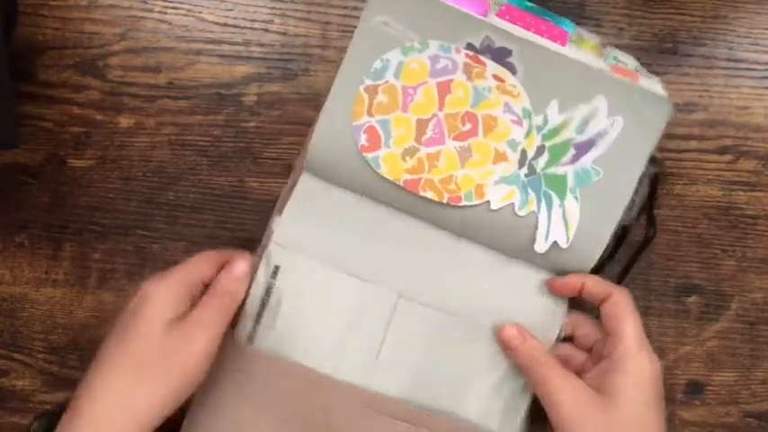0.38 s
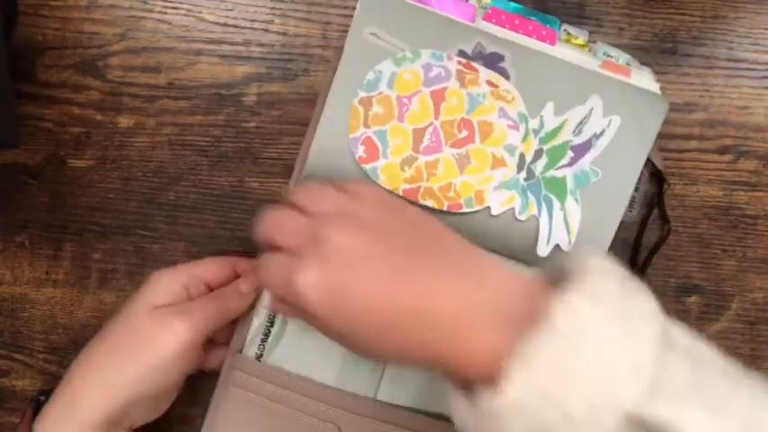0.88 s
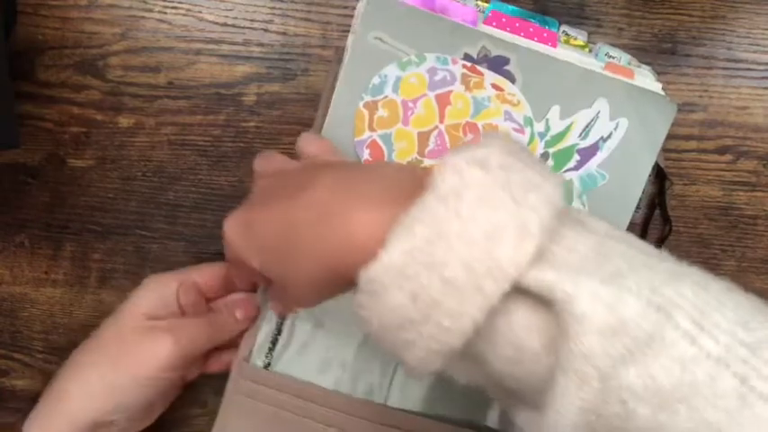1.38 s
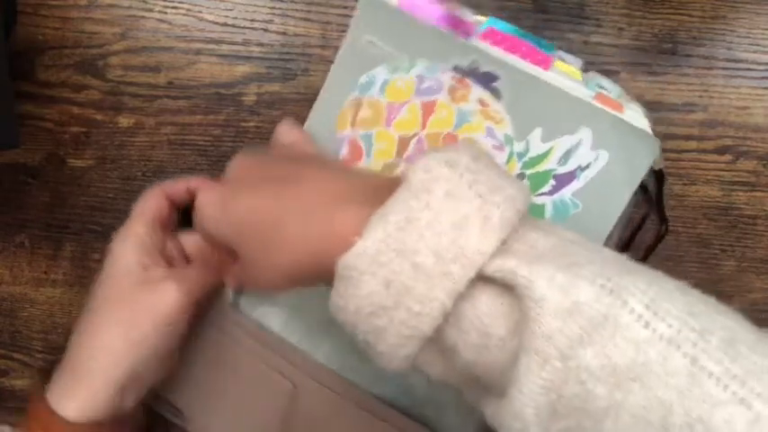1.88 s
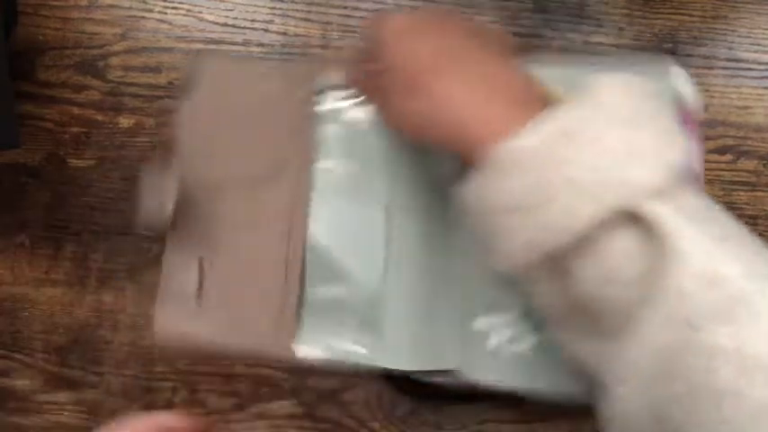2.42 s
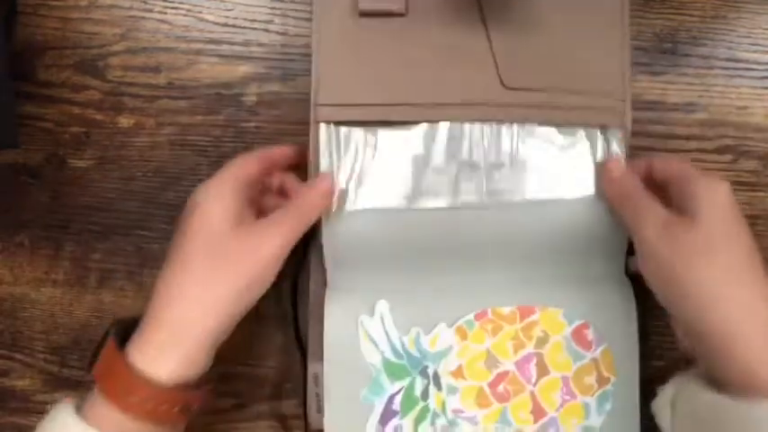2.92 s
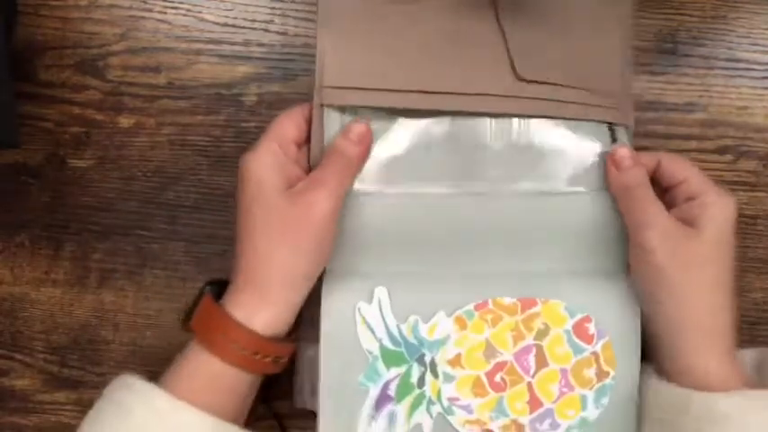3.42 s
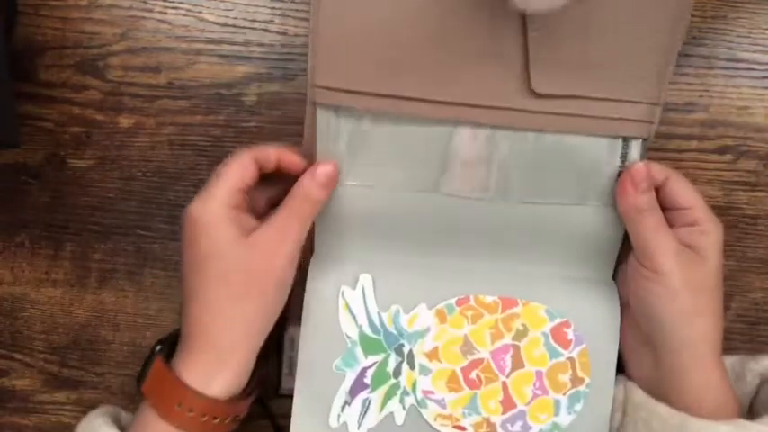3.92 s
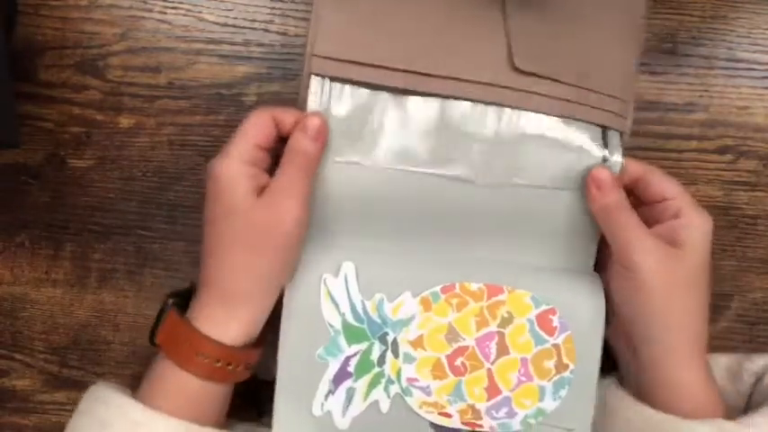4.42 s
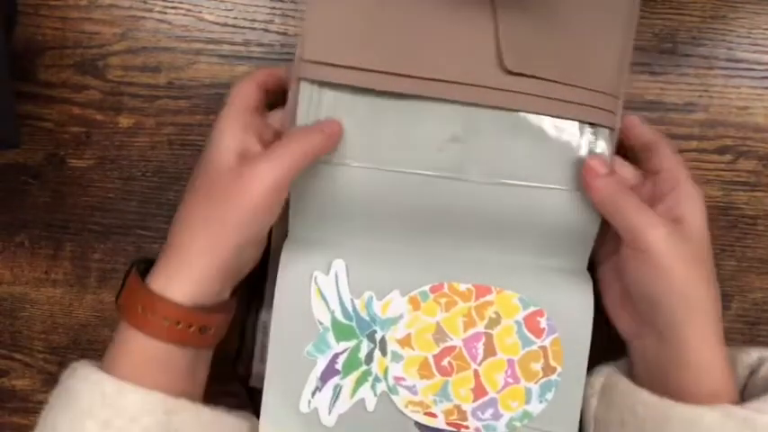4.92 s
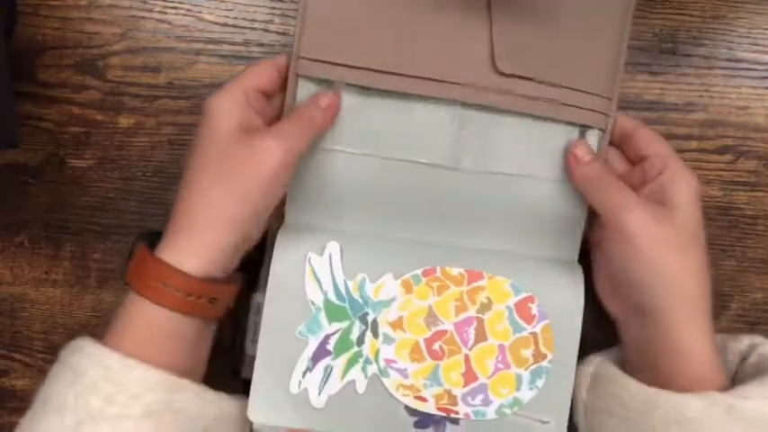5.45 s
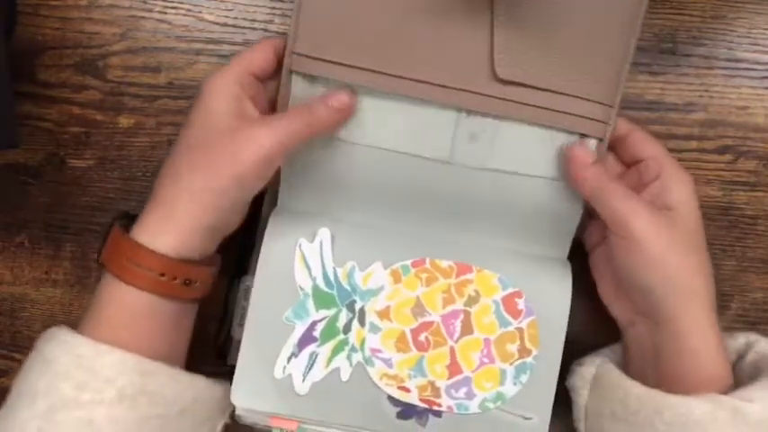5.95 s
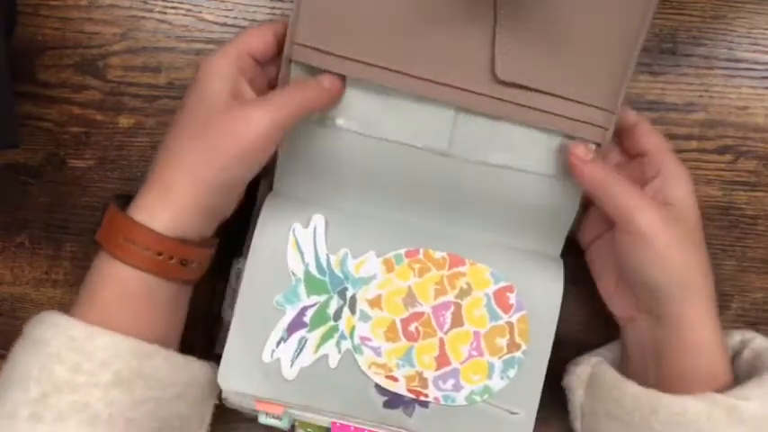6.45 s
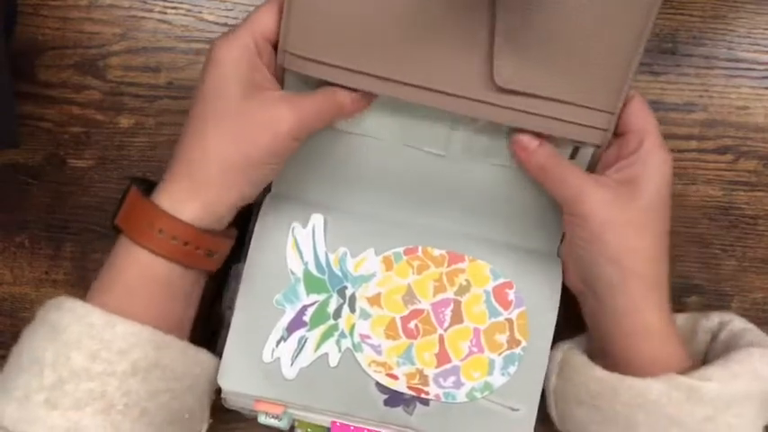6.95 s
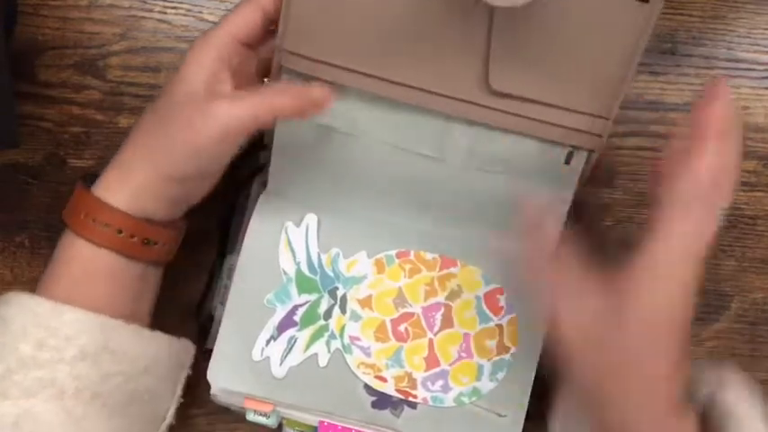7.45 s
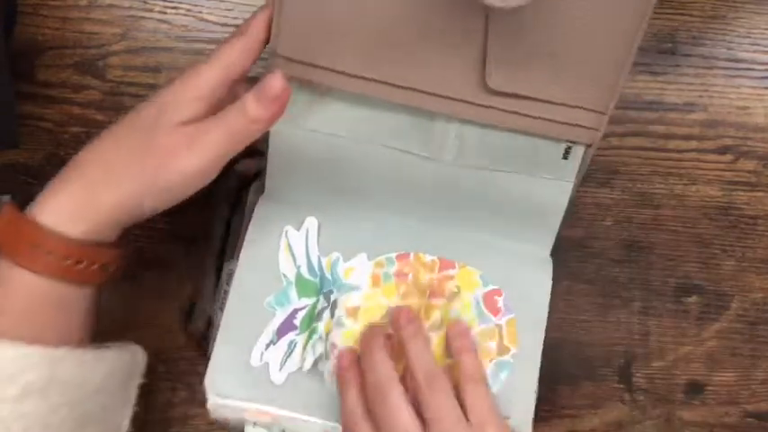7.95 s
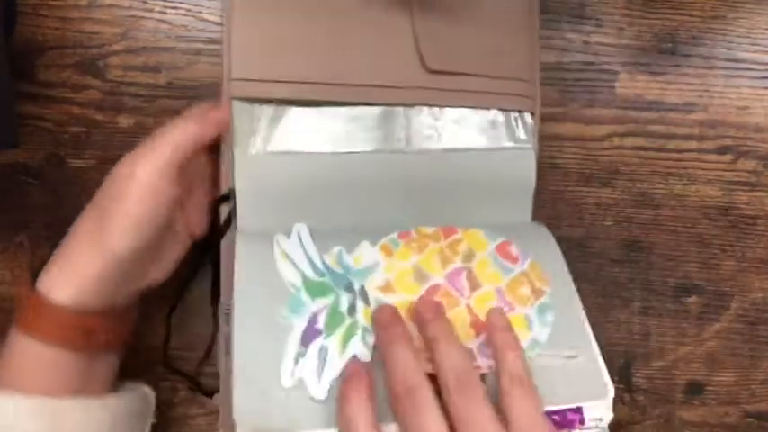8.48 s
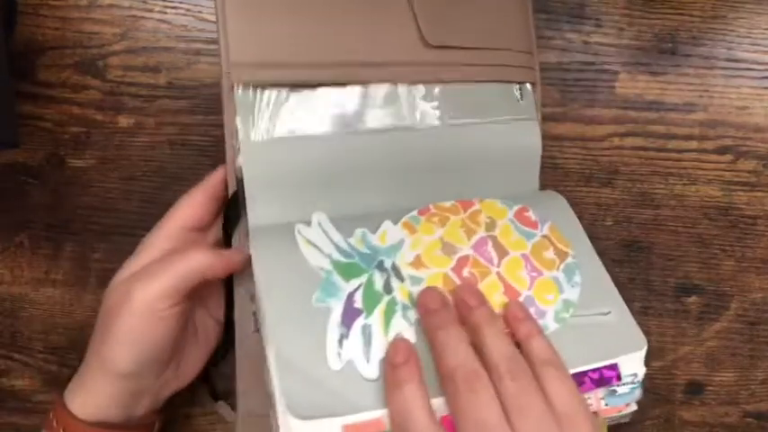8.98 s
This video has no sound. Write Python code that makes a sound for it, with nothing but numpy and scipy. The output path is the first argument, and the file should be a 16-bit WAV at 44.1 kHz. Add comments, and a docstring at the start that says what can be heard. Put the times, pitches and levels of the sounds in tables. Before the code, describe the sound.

Close up in a quiet room, hands work a vinyl-covered notebook into a stiff planner cover. A few snaps and soft rubs come first, then small ticks and two quick creaks. The book is dragged round on the wooden table with a rough rustling scrape. Afterwards come irregular plastic snaps, knocks, low table bumps and short rubs, ending in a brisk palm sweep, a cluster of creaks and cracks, and near quiet.

```python
"""In a quiet room, at a wooden table, hands work a vinyl-covered notebook into a stiff planner cover.
The vinyl snaps, ticks and rustles: short ringing knocks, bursts of treble and shaped noise.
It creaks in the pocket as jerks of uneven slips ring its resonances. The whole book is dragged round
once on the wood (rough friction noise), and bumps make the table top ring low (fading sine waves).
Faint tones linger, and a short room echo and steady room tone lie around it all."""
import sys
import numpy as np
from scipy import signal
from scipy.fft import rfft, irfft, next_fast_len
from scipy.io import wavfile
from scipy.ndimage import uniform_filter1d

SR = 44100
rng = np.random.default_rng(int(sys.argv[2]) if len(sys.argv) > 2 else 0)


def digitize_waveform(pressure):
    """Quantize a signal to 16-bit integers and store it at the path in sys.argv[1].

    Rows of a 2-D input are taken as channels; values are limited to [-1, 1].
    """
    field = np.atleast_2d(pressure).T
    bounded = np.clip(field, -1, 1)
    quanta = np.round(bounded * 32767).astype(np.int16)
    wavfile.write(sys.argv[1], SR, quanta)


def amplitude_ratio(level_db):
    """Convert a level in decibels to the matching linear amplitude (field) ratio."""
    exponent = np.asarray(level_db, float) / 20
    return 10 ** exponent


N = 401310

# colour of the room tone: (frequency [Hz], level [dB per Hz])
AIR_COLOUR = [(38, -5.5), (70, -0.5), (166, 0.5), (818, -8.5), (1940, -14), (4740, -16), (15500, -26)]
# how fast the room echo dies: (frequency [Hz], time to fall 60 dB [s])
ROOM_DECAY = [(250, 0.45), (1000, 0.27), (4000, 0.12)]
# faint tones that linger, some after a knock: (start [s], length [s], pitch [Hz], level [dB])
HUMS = [(.142, .055, 415, -50), (7.14, .56, 182, -65), (5.3, .11, 672, -61), (8.22, .12, 672, -59)]
# ringing modes of the table top: (pitch [Hz], level [dB], time to fall 60 dB [s])
TABLE_MODES = [(105, -5, .12), (158, 0, .26), (184, -9, .3), (290, -3, .07), (420, -8, .08)]
# bumps on the table: (start [s], level [dB], hardness: tilt to the upper modes [dB per octave])
BUMPS = [(0.139, -37.5, 13.5), (0.468, -46, -22), (2.676, -40.5, 11), (2.985, -41.5, -0.5),
         (3.127, -45, -3), (3.36, -32, 8.5), (4.423, -41, 14), (4.652, -35.5, 17), (5.099, -43, 10),
         (5.225, -35, 11.5), (7.704, -39, 7)]
# book turned on the wood: (time [s], scrape of the cover [dB], bright rustle of the vinyl [dB])
DRAG_LEVELS = [(1.9, -62, -80), (2.1, -65, -56), (2.3, -60, -53.5), (2.5, -55.5, -53), (2.7, -55, -58.5),
               (2.98, -71, -72.5)]
# colour of the scrape: (frequency [Hz], level [dB per Hz])
DRAG_COLOUR = [(150, 6), (450, -18), (700, 8), (1600, 2), (4200, -6.5), (7500, -17.5)]
# handling strokes on the cover: (middle [s], length [s], level [dB])
RUB_STROKES = [(0.321, 0.21, -54), (0.459, 0.18, -50.5), (1.667, 0.29, -55.5), (3.093, 0.18, -60.5),
               (3.21, 0.091, -53), (3.381, 0.35, -54.5), (3.666, 0.074, -55), (3.794, 0.074, -58),
               (4.107, 0.19, -58.5), (4.387, 0.47, -60), (4.645, 0.22, -51.5), (5.062, 0.23, -50.5),
               (5.313, 0.31, -63.5), (5.546, 0.3, -53.5), (5.727, 0.18, -56.5), (6.136, 0.23, -52.5),
               (6.317, 0.23, -55.5), (6.993, 1, -65.5), (7.26, 0.37, -64), (7.717, 0.15, -47.5),
               (8.773, 0.96, -66)]
# a palm sweeps over the vinyl alone: (middle [s], length [s], level [dB])
PALM_SWEEPS = [(7.845, 0.24, -44), (7.979, 0.095, -43.5)]
# colour of the rubbed cover: (frequency [Hz], level [dB per Hz])
DULL_COLOUR = [(100, -1), (350, -2.5), (1000, 0.5), (1700, -5), (3000, -21.5), (6000, -25.5)]
# colour of the rustling vinyl: (frequency [Hz], level [dB per Hz])
BRIGHT_COLOUR = [(2400, -0.5), (3800, -0.5), (6000, -4), (9000, -11.5), (15500, -13.5)]
# colour of the palm sweeps: (frequency [Hz], level [dB per Hz])
SWEEP_COLOUR = [(700, -10), (2500, -8), (3700, 4), (5200, -1), (7000, -6.5), (15500, -8.5)]
# resonances of the pocket: (frequency [Hz], level [dB])
POCKET_MODES = [(693, 3.5), (1100, 0), (1310, 12.5), (1758, 11.5), (2290, 9.5), (2666, 12), (3150, 3)]
# stick-slip jerks in the pocket: (start [s], time held [s], level [dB], leading resonance [Hz])
JERKS = [(0.464, 0.034, -42, 1480), (1.171, 0.0054, -44, 920), (1.768, 0.013, -33.5, 1790),
         (1.796, 0.013, -29.5, 1710), (4.857, 0.032, -40, 935), (5.195, 0.0038, -30, 970),
         (5.216, 0.013, -31.5, 920), (5.243, 0.022, -34, 2210), (8.059, 0.037, -38.5, 1690),
         (8.11, 0.039, -36.5, 1100), (8.142, 0.033, -38, 1110), (8.226, 0.0077, -42.5, 1790),
         (8.33, 0.074, -39, 1760), (8.352, 0.058, -32.5, 1730), (8.411, 0.025, -33, 1370),
         (8.457, 0.029, -38, 1330), (8.503, 0.02, -37, 1330), (8.563, 0.017, -39, 1460)]
# thin bright pricks of the film, without a body: (start [s], level [dB])
PRICKS = [(0.875, -50.5), (1.179, -39.5), (1.905, -41.5), (4.753, -41.5), (5.921, -48.5), (6.126, -37),
          (6.196, -38), (8.524, -17.5), (8.791, -47), (8.793, -46), (8.838, -42.5), (8.942, -50),
          (9.067, -53)]
# fingertip taps and small ticks of the cover: (start [s], level [dB], main pitch [Hz])
TAPS = [(0.398, -25, 2150), (0.961, -36, 1520), (0.971, -39, 840), (1.013, -42.5, 1410), (1.336, -31, 660),
        (1.578, -32.5, 1210), (1.602, -38, 606), (1.617, -34.5, 490), (2.043, -44.5, 584), (2.51, -31, 730),
        (3.173, -23, 2200), (3.562, -30, 2600), (3.578, -36, 2700), (3.594, -33, 2680), (3.65, -33, 3230),
        (4.309, -37, 780), (4.704, -32.5, 1080), (4.919, -24, 1100), (4.994, -32, 1640), (5.197, -22, 2330),
        (5.318, -40, 3300), (5.444, -43, 1000), (5.592, -28.5, 1420), (6.085, -40, 930), (6.26, -45, 1100),
        (6.349, -35, 1520), (6.374, -44, 1310), (6.92, -39, 4500), (7.087, -44, 334), (7.271, -28, 3840),
        (7.275, -34, 3760), (7.293, -40, 1100), (7.704, -49, 780), (7.944, -33, 1530), (7.996, -26.5, 2310),
        (8.432, -26, 1350), (8.471, -27.5, 1400)]
# vinyl snaps: (start [s], level [dB], main pitch [Hz], level of the treble crack [dB])
SNAPS = [(0.026, -24, 4030, -38), (0.143, -37.5, 625, -39.5), (0.199, -37.5, 1440, -45.5),
         (0.765, -34.5, 726, -47), (0.801, -36.5, 740, -41), (2.94, -42, 830, -42),
         (3.354, -33, 880, -33.5), (3.545, -29, 2870, -29), (4.094, -31, 760, -28.5),
         (4.464, -24, 3560, -43), (4.575, -33, 840, -30.5), (4.621, -34.5, 738, -31.5),
         (4.653, -20, 3250, -24), (5.831, -41, 990, -34.5), (6.113, -35, 890, -50),
         (6.314, -34.5, 1760, -29.5), (6.39, -35.5, 1020, -24.5), (6.804, -19, 2310, -20.5),
         (6.935, -29, 3500, -30), (7.011, -40, 1020, -37), (7.226, -41, 1400, -36), (8.006, -22, 2030, -47),
         (8.063, -17.5, 2200, -40), (8.217, -29, 1690, -31.5), (8.5, -29, 1310, -26.5)]

BUCKLE_S = 0.001437  # the film gives way for a moment before it snaps


def evened(x):
    """Scales to an average strength (rms) of 1."""
    return x / np.sqrt(np.mean(x ** 2) + 1e-20)


def coloured(x, points):
    """Filters x by a spectrum, falling steeply beyond its ends; rms 1."""
    size = next_fast_len(len(x))
    log_hz = np.log(np.fft.rfftfreq(size, 1 / SR) + 1)
    hz, db = np.transpose(points)
    log_points = np.log(hz)
    beyond = np.maximum(log_points[0] - log_hz, 0) + np.maximum(log_hz - log_points[-1], 0)
    db = np.interp(log_hz, log_points, db) - 25 * beyond
    return evened(irfft(rfft(x, size) * amplitude_ratio(db), size)[:len(x)])


def band(x, low_hz, high_hz):
    """Keeps one band, with steep edges."""
    return signal.sosfilt(signal.butter(N=3, Wn=[low_hz, high_hz], btype="band", fs=SR, output="sos"), x)


def resonate(x, hz, width):
    """Shifts the pitch hz down to zero, smooths, and shifts back: a resonance of gain 1."""
    turn = np.exp(2j * np.pi * np.cumsum(hz * np.ones(len(x))) / SR)
    r = np.exp(-np.pi * width / SR)
    return 2 * (turn * signal.lfilter([1 - r], [1, -r], x / turn)).real


def steep(x, hz, width):
    """A resonance applied twice: darker flanks."""
    return resonate(resonate(x, hz, width), hz, width)


def curve(rows, column):
    """A level curve as a gain for every sample, at -120 dB outside its rows."""
    rows = np.array(rows)
    return amplitude_ratio(np.interp(np.arange(N) / SR, rows[:, 0], rows[:, column], left=-120, right=-120))


def add(mix, s, sound):
    """Mixes a sound in at s seconds."""
    part = mix[round(s * SR):][:len(sound)]
    part += sound[:len(part)]


def swells(rows):
    """A gain for every sample: each stroke swells and fades."""
    out = np.zeros(N)
    for s, length, db in rows:
        add(out, s - length / 2, amplitude_ratio(db) * np.hanning(round(length * SR)))
    return out


def slips(length, per_s, spread_db, ms, smooth):
    """Friction: noise in small fading puffs of uneven size, one for each slip, over a smooth share."""
    happens = rng.random(length) < per_s / SR
    size = amplitude_ratio(spread_db * np.minimum(rng.exponential(1, length), 4)) * happens
    puffs = signal.lfilter([1], [1, -np.exp(-1000 / (ms * SR))], size)
    return evened((smooth + evened(puffs)) * rng.standard_normal(length))


def air():
    """Quiet room tone and microphone hiss: coloured noise that wavers slowly."""
    smoothed = uniform_filter1d(uniform_filter1d(rng.standard_normal(N), SR // 20), SR // 20)
    level_db = -65.5 + 1.3 * evened(smoothed)
    return amplitude_ratio(level_db) * coloured(rng.standard_normal(N), AIR_COLOUR)


def room(x):
    """A dense echo after a short delay: fading noise, each band dying at its own speed."""
    hz, t, z = signal.stft(rng.standard_normal(SR // 2), SR, nperseg=256)
    points, t60 = np.transpose(ROOM_DECAY)
    band_t60 = np.interp(np.log(hz + 1), np.log(points), t60)[:, None]
    tail = signal.istft(z * amplitude_ratio(-60 * t / band_t60), SR, nperseg=256)[1]
    delay = np.zeros(round(0.0077 * SR))
    tail = np.concatenate([delay, tail / np.linalg.norm(tail)])
    return signal.fftconvolve(x, tail)[:N]


def hum(s, length, hz, db):
    """A soft tone that swells and fades, made unsteady by narrow noise at its pitch."""
    t = np.arange(round(length * SR)) / SR
    unsteady = evened(steep(rng.standard_normal(len(t)), hz, hz / 10))
    tone = np.sin(2 * np.pi * hz * t) + 0.5 * unsteady
    return s, amplitude_ratio(db) * tone * signal.windows.tukey(len(t), 0.6)


def bump(s, db, hard_db):
    """A push rings the modes of the table top; a harder one favours the upper modes."""
    t = np.arange(SR // 2) / SR
    ring = np.zeros(len(t))
    for hz, mode_db, t60 in TABLE_MODES:
        chance_db = 2 * rng.standard_normal()
        fading_db = mode_db + hard_db * np.log2(hz) + chance_db - 60 * t / t60
        ring += amplitude_ratio(fading_db) * np.sin(2 * np.pi * hz * t)
    onset = 1 - np.exp(-t / 0.00057)
    return s, amplitude_ratio(db) * ring / abs(ring).max() * onset


def drag():
    """Dense fine friction of the cover on the wood grain, with a bright rustle of the vinyl."""
    drive = slips(N, per_s=830, spread_db=5.0, ms=6.9, smooth=6.0)
    catches = slips(N, per_s=49, spread_db=-6, ms=22, smooth=0.41)  # the edge catches unevenly, low down
    scrape = coloured(drive, DRAG_COLOUR) + 0.5 * evened(band(catches, 240, 980))
    # bands of the rustle sink in pitch as the book swings round, from 2.24 s on
    sink = np.exp(-np.maximum(np.arange(N) / SR - 2.24, 0))
    bands = sum(steep(drive, hz * sink, width=700) for hz in (2580, 3900, 5200))
    rustle = evened(coloured(drive, BRIGHT_COLOUR) + 0.66 * evened(bands))
    return curve(DRAG_LEVELS, 1) * scrape + curve(DRAG_LEVELS, 2) * rustle


def ticks(per_s, spread_db):
    """Sparse creases of the film, each ringing a few cycles at one of twelve pitches."""
    size = amplitude_ratio(spread_db * np.minimum(rng.exponential(1, N), 3)) * (rng.random(N) < per_s / SR)
    pitches = np.geomspace(650, 3500, num=12)
    t = np.arange(800) / SR
    patch = rng.integers(0, len(pitches), N)
    out = np.zeros(N)
    for k, hz in enumerate(pitches):
        ring = np.sin(2 * np.pi * hz * t) * np.exp(-t * hz / 4.8)
        out += signal.oaconvolve(size * (patch == k), ring)[:N]
    return evened(out)


def rub():
    """The cover rubs dull with small ticks; the film rustles bright, hisses evenly and cracks finely."""
    drive = slips(N, per_s=250, spread_db=-17.5, ms=13.3, smooth=0.47)
    dull = evened(coloured(drive, DULL_COLOUR) + 1.03 * ticks(per_s=140, spread_db=1.0))
    tiny_cracks = slips(N, per_s=68, spread_db=1.0, ms=0.93, smooth=0)
    bright = coloured(drive + 0.19 * rng.standard_normal(N) + 0.78 * tiny_cracks, BRIGHT_COLOUR)
    palm = coloured(drive + 0.79 * rng.standard_normal(N), SWEEP_COLOUR)
    # the vinyl rustles 1 dB under the rub, up to a ceiling of -58 dB
    rustles = [(s, length, min(db - 1, -58)) for s, length, db in RUB_STROKES]
    return swells(RUB_STROKES) * dull + swells(rustles) * bright + swells(PALM_SWEEPS) * palm


def creak(s, length, db, hz):
    """Quick uneven slips ring the pocket, led by one resonance of its present bend; the film joins in."""
    slip_gap_s, slip_s = 0.0065, 0.0013  # mean gap and decay of the slips
    t = np.arange(SR // 5) / SR
    # a jerk starts at once, holds, then dies away by 900 dB per second
    grip = np.minimum(t / 0.0012, 1) * amplitude_ratio(-900 * np.maximum(t - length, 0))
    gaps = rng.random(200) * 2 * slip_gap_s
    at = (np.cumsum(gaps) - gaps[0]) * SR
    at = at[at < len(t)].astype(int)
    lets_go = np.zeros(len(t))
    lets_go[at] = amplitude_ratio(2.64 * rng.standard_normal(len(at)))
    lets_go[0] = 2  # the first slip breaks loose strongly
    puffs = signal.lfilter([1], [1, -np.exp(-1 / (slip_s * SR))], lets_go)
    drive = grip * rng.standard_normal(len(t)) * (0.42 + puffs)

    body = np.zeros(len(t))
    for mode_hz, mode_db in POCKET_MODES:
        # damped film; each jerk finds the pocket bent a little differently
        chance, bend = rng.standard_normal(2)
        body += amplitude_ratio(mode_db + 2.2 * chance) * steep(drive, mode_hz * (1 + 0.05 * bend), width=250)
    lead = steep(drive, hz, width=190)
    wide = steep(drive, 2220, width=5400)
    sound = evened(band(evened(body) + 0.96 * evened(lead) + 2.05 * evened(wide), 272, 3640))
    sound = sound + 0.1 * coloured(drive, BRIGHT_COLOUR)
    held_share = (grip ** 2).sum() / len(t)  # so the level holds for the jerk, not for the silence after it
    return s, amplitude_ratio(db) * evened(sound) * np.sqrt(held_share)


def buckle_times():
    """Distance in seconds from the moment of the snap, and a gain that rises up to that moment."""
    samples = np.arange(1400)
    return abs(samples - round(BUCKLE_S * SR)) / SR, np.minimum(samples / (BUCKLE_S * SR), 1)


def prick(s, db):
    """The film cracks finely: a very short burst of treble noise."""
    t, start = buckle_times()
    noise = rng.standard_normal(len(t))
    crack = band((noise + coloured(noise, BRIGHT_COLOUR)) * np.exp(-t / 0.0009), 1700, 14500)
    return s, amplitude_ratio(db) * start * crack / abs(crack).max()


def snap(s, db, hz, crack_db=-90):
    """A few fast cycles at the panel's pitch, a sharper crack, and a short rattle around them."""
    t, start = buckle_times()
    kick_noise, rattle_noise = rng.standard_normal((2, len(t)))
    kick = (t == 0) + 0.092 * kick_noise * np.exp(-t / 0.0039)
    knock = steep(kick, hz, 0.85 * hz) + 0.49 * steep(kick, 1010, 1290)
    rattle = steep(rattle_noise, hz, 1.23 * hz) * np.exp(-t / 0.0033)
    body = knock / abs(knock).max() + 0.38 * rattle / abs(rattle).max()
    body = amplitude_ratio(db) * band(body, 152, 3.13 * hz + 900)
    crack = prick(s, crack_db)[1]
    return s, start * body + crack


def scene():
    """Everything on the table, its room echo, and the room tone."""
    near = drag() + rub()
    events = ((hum, HUMS), (bump, BUMPS), (creak, JERKS), (prick, PRICKS), (snap, TAPS), (snap, SNAPS))
    for sound, table in events:
        for row in table:
            add(near, *sound(*row))
    # the deep bass below 70 Hz is cut away
    near = signal.lfilter(*signal.butter(N=2, Wn=70, btype="high", fs=SR), near)
    return (near + amplitude_ratio(-14.0) * room(near) + air())[None]


def band_limit(x):
    """A steep low-pass at the top of the band."""
    return signal.sosfilt(signal.butter(12, 16830, fs=SR, output="sos"), x)


def record(dry):
    """Cuts the treble above 15.9 kHz and finishes the sound."""
    edge = signal.firwin(255, 15900, window=("kaiser", 4), fs=SR)
    mix = signal.oaconvolve(dry, edge[None], "same")
    return band_limit(mix)


dry = scene()
out = record(dry)
digitize_waveform(out)
```